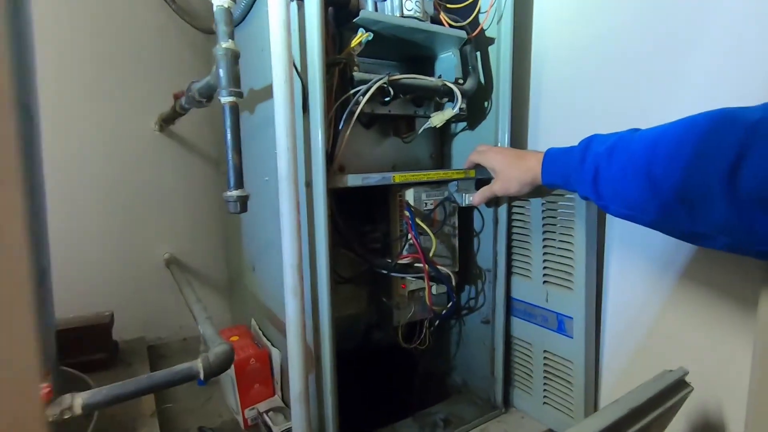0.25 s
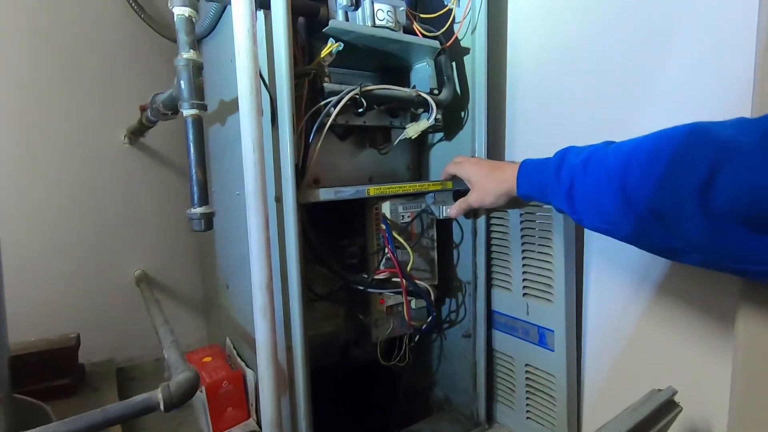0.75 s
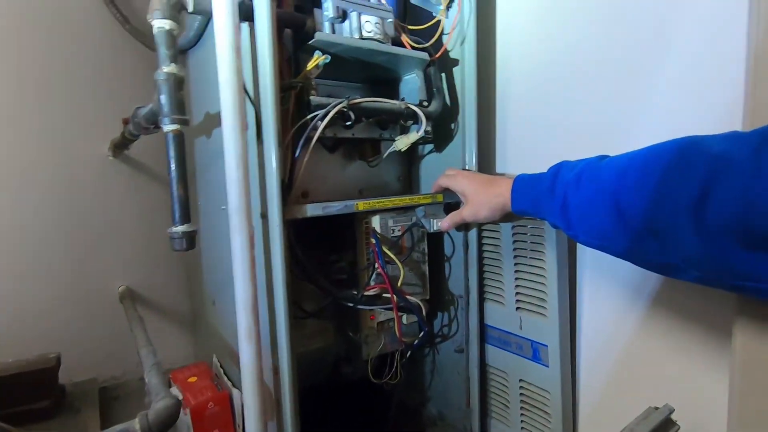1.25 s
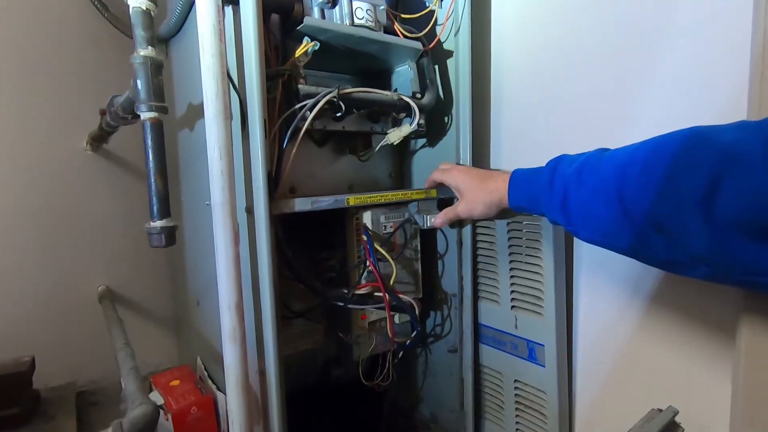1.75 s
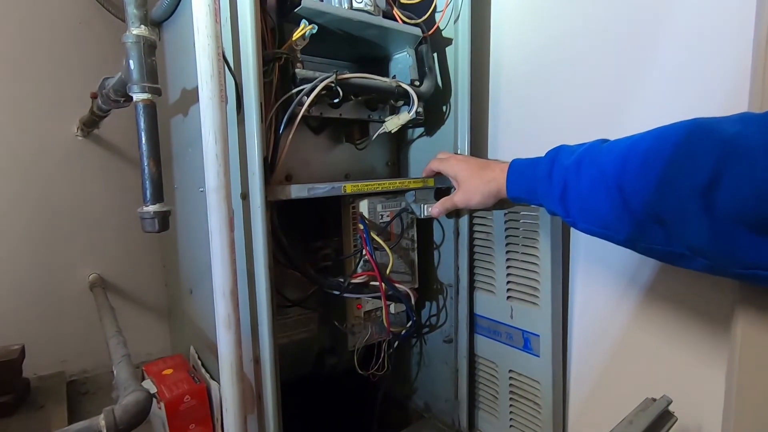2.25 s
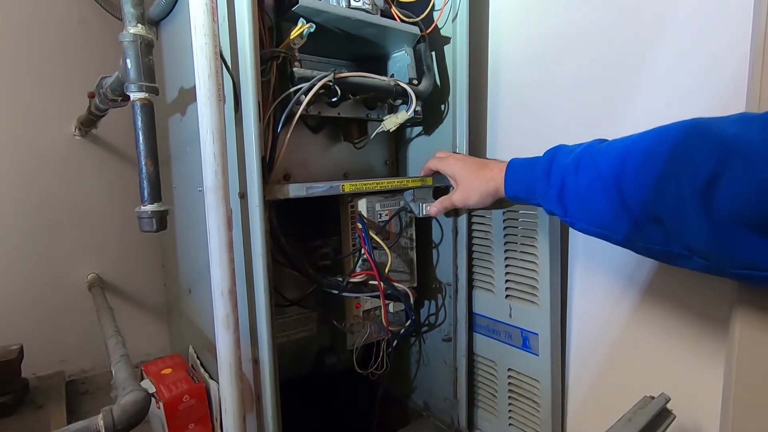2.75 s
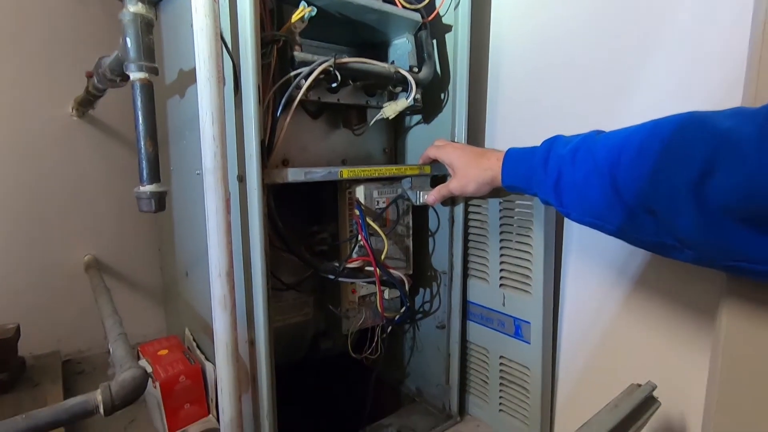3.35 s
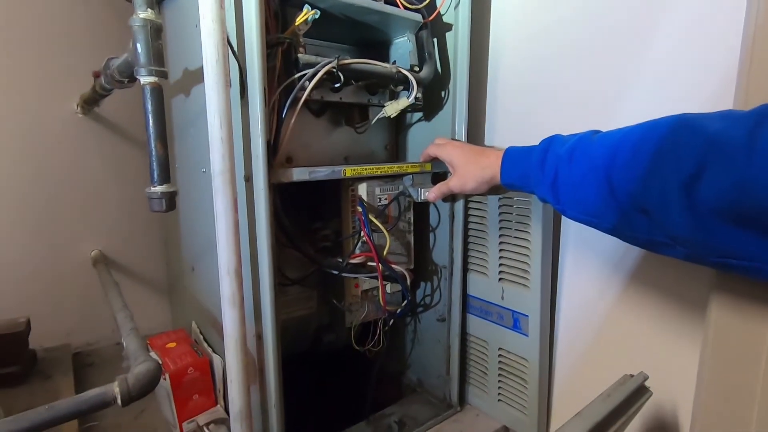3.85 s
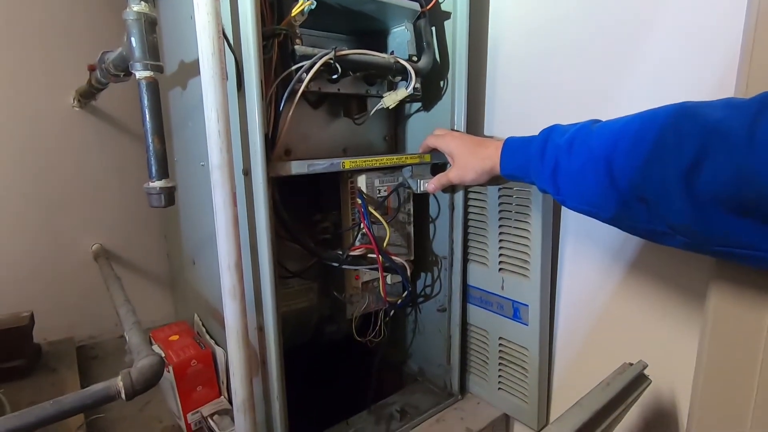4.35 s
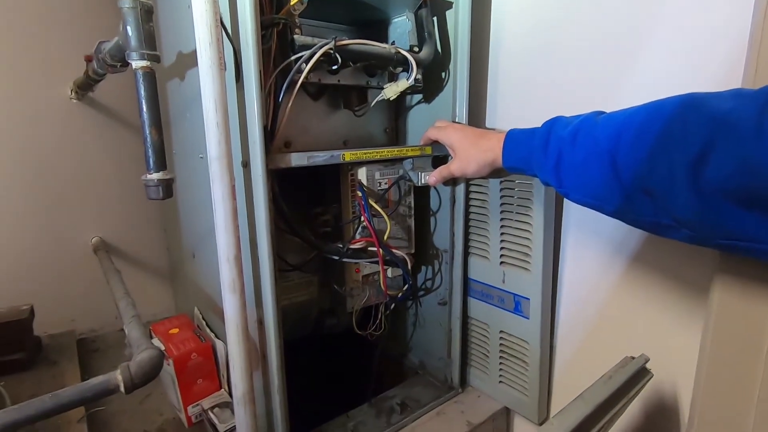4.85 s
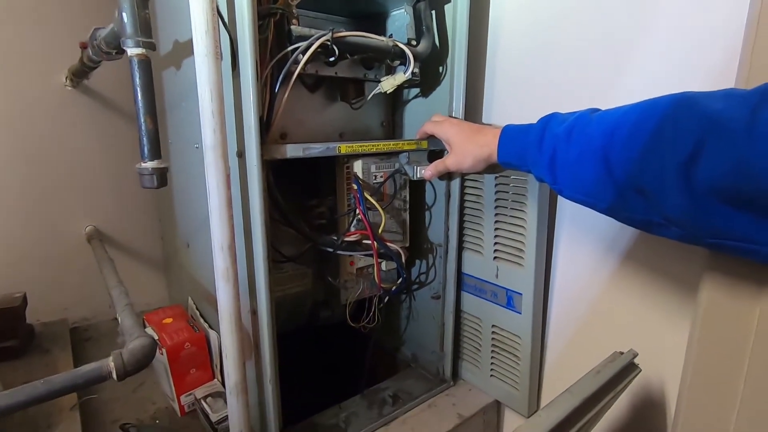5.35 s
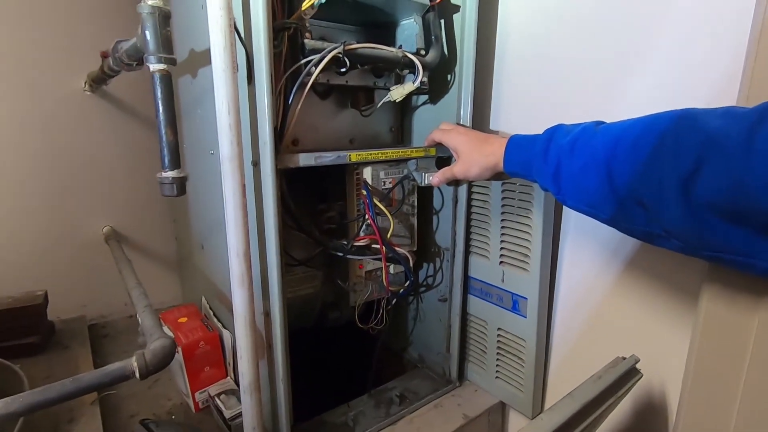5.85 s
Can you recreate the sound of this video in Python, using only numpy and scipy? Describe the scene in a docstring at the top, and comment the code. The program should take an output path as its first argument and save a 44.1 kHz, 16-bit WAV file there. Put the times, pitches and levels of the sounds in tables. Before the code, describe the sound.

A metallic clank dies away, a scuff and hard knock hit the camera, then a furnace blower swells into a low humming, booming rush of air.

```python
"""Furnace draft motor in an open cabinet

Mains hum and shaft tones, made of sine waves, sit in a booming airflow made of coloured noise. The motor
runs in an open sheet-metal cabinet, an arm's length from a small camera with two sound ports. A clank dies
away and something scuffs, both shaped noise; small ticks and a knock on the camera are sums of dying sines.
From the knock on, the stereo picture folds to one duller channel for some seconds, then creeps open again."""
import sys
import numpy as np
from scipy import signal
from scipy.fft import rfft, irfft
from scipy.io import wavfile
from scipy.ndimage import uniform_filter1d, map_coordinates

SR = 44100
rng = np.random.default_rng(int(sys.argv[2]) if len(sys.argv) > 2 else 0)


def nominal_scale(level):
    """Amplitude ratio for a level in decibels (scalar or array-like)."""
    x = np.asarray(level, float) / 20
    return 10 ** x


def waveform_to_disk(signal):
    """Save audio, clipped to [-1, 1], as 16-bit WAV at the path in sys.argv[1]."""
    frames = np.transpose(np.atleast_2d(signal))
    scaled = np.clip(frames, -1, 1) * 32767
    samples = np.round(scaled).astype(np.int16)
    wavfile.write(sys.argv[1], SR, samples)


N = 268613  # length in samples
T = np.arange(N) / SR  # time of each sample in seconds
HZ = np.maximum(np.fft.rfftfreq(N, 1 / SR), 1)  # frequencies of the spectrum

# Motor tones. Each entry: (hum order, shaft order), level in dB against the slow trend of the boom.
MOTOR_TONES = {(0, 1): -4.5, (0, 2): -13, (0, 3): -17, (0, 4): -16.5, (1, 2): -9, (2, 0): -13, (0, 5): -12.5, (2, 1): -19.5, (2, 2): -27, (3, 0): -13, (3, 1): -23, (4, -1): -23.5, (0, 9): -28, (4, 0): -38, (0, 10): -23, (4, 1): -17, (4, 2): -22.5, (6, -1): -27, (6, 0): -28.5, (7, 0): -28, (8, 3): -36}
# Level of the narrow band around the hum, with chance dips where noise and tone interfere.
# Each row: time in seconds, level in dB.
HUM_LEVEL = [(0.0, -44.5), (0.29, -34), (0.39, -52), (0.85, -25.5), (1.56, -28), (1.61, -38.5),
             (1.91, -19.5), (1.95, -26), (2.09, -27.5), (2.14, -30.5), (2.19, -26), (2.31, -19.5),
             (2.54, -33), (2.75, -24), (3.09, -27.5), (3.21, -23.5), (3.9, -29), (3.92, -39), (4.02, -27.5),
             (4.51, -27), (4.61, -41), (4.8, -27.5), (4.87, -40), (5.04, -27.5), (5.09, -35), (5.17, -29.5),
             (5.44, -25.5), (5.56, -42), (5.78, -22.5), (6.09, -32.5)]
# The whine of the wheel's blades. Each row: time in seconds, level in dB.
WHINE_LEVEL = [(0.33, -63), (1.0, -53.5), (1.8, -55), (2.3, -53.5), (2.8, -54), (3.4, -51), (3.6, -54.5),
               (3.91, -49.5), (4.2, -54), (4.53, -50), (4.95, -51), (5.5, -56), (6.09, -57)]
# The draft swells as the wheel loads up, then eases.
# Each row: time in seconds, cabinet boom in dB, flue rumble in dB, rush of air in dB.
DRAFT_LEVELS = [(0.0, -38, -38.5, -41.5), (0.35, -38.5, -33.5, -44), (0.58, -35, -29.5, -44),
                (0.66, -29.5, -33.5, -43.5), (0.8, -28, -27.5, -41), (1.25, -27, -25.5, -38.5),
                (1.6, -27.5, -26.5, -39), (1.9, -25, -25.5, -40), (2.25, -28.5, -22, -39.5),
                (2.5, -27, -24.5, -40), (3.2, -28.5, -26, -41), (3.5, -29.5, -27.5, -42),
                (4.6, -32, -29, -42), (4.9, -31.5, -28, -42), (5.3, -33, -30, -41.5), (5.7, -32, -31, -42),
                (6.09, -35, -32, -41.5)]
# Resonances of the flue. Each row: frequency in Hz, width in Hz, relative level in dB.
FLUE_MODES = [(25, 48, -8), (59.6, 11, 5), (62.4, 11, -11.5), (99.6, 49, 0.5), (122.7, 25, -2.5)]
# Resonances of the cabinet. Each row: frequency in Hz, width in Hz, relative level in dB.
CABINET_MODES = [(141.5, 41, -11.5), (191, 19, -19), (210, 39, -15.5), (222.6, 43, -10.5), (246.7, 22, -12),
                 (272, 18, -18.5), (290.6, 21.6, -10), (319, 24, -17.5), (348.5, 33, -17), (387, 20, -19),
                 (412.5, 9.9, -14), (432, 16, -21.5), (480, 49, -23.5), (551, 54, -22), (628, 22, -30)]
# Chance swells and dips of a narrow noisy boom near 228 Hz. Each row: time in seconds, level in dB.
NARROW_BOOM_LEVEL = [(0.0, -47), (0.52, -35.5), (0.57, -67), (0.64, -24), (0.83, -43.5), (1.39, -25),
                     (1.44, -41), (1.49, -22), (1.71, -35.5), (1.75, -17.5), (1.8, -35), (1.93, -25.5),
                     (2.19, -34), (2.22, -22), (2.32, -49), (2.41, -22.5), (2.76, -39.5), (2.88, -20),
                     (2.92, -39), (2.95, -30.5), (3.24, -23.5), (3.31, -40), (3.34, -26), (3.7, -40),
                     (3.92, -27.5), (3.95, -46.5), (4.0, -27.5), (4.14, -41), (4.17, -36.5), (4.51, -31.5),
                     (4.63, -53), (4.7, -31.5), (5.9, -37.5), (6.09, -40)]
# Colour of the rushing air. Each row: frequency in Hz, relative level in dB per Hz.
RUSH_COLOUR = [(350, -39), (600, 2), (675, -6), (931, -2), (1060, -5), (1290, -8), (1360, -11.5),
               (1530, -10), (1810, -7), (1860, -10), (2200, -13.5), (2920, -13.5), (3700, -16.5),
               (4600, -19), (6200, -24.5), (8060, -55), (13600, -120)]
# The bright part of the rush, fullest while the draft builds. Each row: time in seconds, level in dB.
BRIGHT_LEVEL = [(0.5, -69), (0.8, -50.5), (1.2, -49.5), (2.0, -52), (2.9, -53.5), (3.5, -67), (3.9, -61),
                (4.3, -55.5), (6.09, -53.5)]
# Colour of that bright part. Each row: frequency in Hz, width in Hz, relative level in dB.
BRIGHT_MODES = [(1900, 1000, -8.5), (2750, 1900, 3)]
# The thin hiss of the draft. Each row: time in seconds, level in dB.
THIN_HISS_LEVEL = [(0.25, -62), (0.5, -70), (0.7, -65), (1.1, -59.5), (2.1, -59), (2.4, -60.5), (3.2, -61),
                   (4.5, -59), (5.0, -59.5), (5.3, -57), (6.09, -57)]
# Colour of the thin hiss. Each row: frequency in Hz, relative level in dB per Hz.
THIN_HISS_COLOUR = [(3060, -17), (5200, -3), (5860, -4), (6570, 1.5), (7620, -2), (8830, -8.5), (9960, -9),
                    (10900, -14.5), (11400, -30.5), (13900, -28.5), (14600, -47), (22000, -120)]
# Panel ripples in rush and hiss. Each row: frequency in Hz, width in Hz, strength in dB.
PANEL_RIPPLES = [(775, 97, 2.5), (938, 18, 5), (1119, 15, 6.5), (1270, 36, 3), (1432, 21, 8.5),
                 (1617, 27, 2.5), (1895, 41, 1), (1972, 42, 2.5), (2073, 49, 3), (2350, 51, -1.5),
                 (2580, 33, 1.5), (3130, 120, -1), (4850, 200, -1.5), (6750, 95, 0), (7670, 980, 1.5)]
# Stereo width of the open picture. Each row: frequency in Hz, side minus mid in dB.
SIDE_COLOUR = [(60, -33.5), (110, -39), (190, -75), (340, -10.5), (600, -10), (1060, 2), (1890, -2),
               (3360, -7.5), (5970, -2.5), (10600, 4.5)]
# Modes of the camera body. Each row: frequency in Hz, time to fall 60 dB in seconds,
# left level in dB, right level in dB, lag of the right in radians.
BODY_MODES = [(115, .07, -14, -5.5, 3.), (155, .09, -20, -13, 2.4), (215, .045, -10, -7.5, -1.4),
              (850, .02, -18, -12, 2.3), (1150, .012, -9, -5, 3.0), (1270, .055, -14, -17, 2.5),
              (1620, .025, -19, -18, 1.6), (2800, .01, -26, -20, 1.8), (3250, .01, -24, -18, 1.8)]
# Colour of the scuff. Each row: frequency in Hz, width in Hz, relative level in dB.
SCUFF_MODES = [(1550, 1300, 10.5), (2500, 1300, -5), (3800, 400, -12), (5500, 2500, -33), (7070, 630, -7),
               (9600, 1500, -13)]
# The scuff's squeal. Each row: time in seconds, level in dB.
SQUEAL_LEVEL = [(0.1, -78), (0.15, -66), (0.17, -51), (0.19, -47), (0.25, -51), (0.285, -50), (0.306, -57),
                (0.34, -51.5), (0.43, -56), (0.5, -61), (0.6, -90)]
# Resonances of the squeal. Each row: frequency in Hz, width in Hz, relative level in dB.
SQUEAL_MODES = [(3675, 180, 0), (3900, 200, -9)]
# Colour of the clank. Each row: frequency in Hz, relative level in dB per Hz.
CLANK_COLOUR = [(300, -28), (430, 1), (540, -9), (610, 1.5), (690, 3.5), (790, -25), (1250, -14),
                (1800, -10.5), (2400, -13.5), (6200, -22.5), (10300, -36.5), (14400, -62), (22000, -120)]
# Small ticks in the cabinet. Each row: start in seconds, overall level in dB.
TICK_TIMES = [(1.4103, -32.5), (3.3094, -43)]
# Bounces of each tick. Each row: delay after the tick in seconds, relative level in dB.
TICK_BOUNCES = [(0, 0), (.0055, -4), (.014, -14)]
# Struck sheet metal. Each row: frequency in Hz, time to fall 60 dB in seconds, relative level in dB.
SHEET_MODES = [(825, .02, 5), (1230, .025, 3), (1480, .022, 4), (1800, .025, 0), (2180, .012, 4),
               (2730, .01, 3), (3600, .008, -14)]
# Colour of the folded channel against the open picture. Each row: frequency in Hz, gain in dB.
FOLDED_COLOUR = [(100, -0.6), (350, -2), (800, -0.1), (1500, 0), (2500, 0.5), (3800, -2.5), (5000, -0.5),
                 (6000, -10), (7500, -1), (10000, 2)]
# Low-bass cut, deepest near 43 Hz. Each row: frequency in Hz, gain in dB.
LOW_BASS_CUT = [(20, -7), (43, -17), (50, -3.5), (56, -0.5), (200, -0.5)]
# Colour of the faint treble noise floor. Each row: frequency in Hz, relative level in dB per Hz.
NOISE_FLOOR_COLOUR = [(2500, -22), (4500, 0), (8000, -6), (11000, -11.5), (14300, -15), (15000, -57.5)]

MAINS_HUM_HZ, SHAFT_HZ, SHAFT_WANDER_HZ = 119.98, 51.9, 0.015
HUM_FLUTTER_DB, HUM_WANDER_RAD = 2.6, 0.8
BLADES = 34
NARROW_BOOM_HZ, NARROW_BOOM_WANDER_HZ = 228, 7
GUST_DB, GUST_PER_S = 1.1, 11
SPUTTER_DB, SPUTTER_PER_S = 6, 10.8
KNOCK_S = 0.2817
THUMP_LATE_S = 0.0022  # the shell's low modes answer after the crack
SCUFF_S, SCUFF_DB, SCUFF_LEAD_DB = 0.16, -41, -49  # it bites at SCUFF_S out of a faint rub
SCUFF_ATTACK_S, SCUFF_HOLD_S, SCUFF_FADE_DB_PER_S = 0.0075, 0.06, -63.5
CLANK_DB, CLANK_T60_S = -27.5, 0.19
FOLD_TAU_S, OPEN_S, OPEN_TAU_S = 0.22, 2.93, 1.54
NOISE_FLOOR_DB = -74.5


def curve(rows):
    """Turn each level column of a time table into one value a sample."""
    s, *columns = np.transpose(rows)
    return [np.interp(T, s, c) for c in columns]


def shape(points):
    """Gain per frequency, drawn through (Hz, dB) points."""
    hz, db = np.transpose(points)
    return nominal_scale(np.interp(np.log(HZ), np.log(hz), db))


def rings(modes):
    """Gain per frequency of resonances, each as steep as two in series."""
    power = 0
    for hz, width, db in modes:
        power = power + nominal_scale(db) ** 2 / (1 + (2 * (HZ - hz) / width) ** 2) ** 2
    return np.sqrt(power)


def noise(gain, side_db=0.):
    """Coloured noise: a mid of rms 1 and an unrelated side."""
    spread = [np.ones_like(HZ), shape(SIDE_COLOUR) * nominal_scale(side_db)]
    mid, side = irfft(rfft(rng.standard_normal((2, N))) * gain * spread, N)
    return np.array([mid, side]) / mid.std()


def walk(rate):
    """A wandering value: random levels held for 1 / rate seconds and smoothed twice; spread near 1."""
    k = int(SR / rate)
    held = np.repeat(rng.standard_normal(N // k + 1), k)
    return 1.278 * uniform_filter1d(uniform_filter1d(held, k), k)[:N]


def ring(start_s, hz, t60_s, lag=0.):
    """One dying tone struck at start_s; it takes part of a cycle to swell."""
    age = np.clip(T - start_s, 0, 1)
    swell = 1 - np.exp(-age * hz / .35)
    decay = np.exp(-np.log(1000) * age / t60_s)
    return swell * decay * np.sin(2 * np.pi * hz * age - lag)


def motor():
    """Magnetic hum at twice the mains, beating with the shaft; the wheel's blades whine."""
    hum_db, whine_db, boom_db = curve(HUM_LEVEL)[0], curve(WHINE_LEVEL)[0], curve(DRAFT_LEVELS)[0]
    shaft = 2 * np.pi * np.cumsum(SHAFT_HZ + SHAFT_WANDER_HZ * walk(3)) / SR
    mains = 2 * np.pi * MAINS_HUM_HZ * T
    hum = nominal_scale(hum_db + HUM_FLUTTER_DB * walk(18)) * np.cos(mains + HUM_WANDER_RAD * walk(14))
    whine = nominal_scale(whine_db + 0.53 * walk(4.6)) * np.sin(BLADES * shaft)
    out = hum + whine
    # the tones swell with the slow trend of the boom and stay loosely in step with hum and shaft
    trend = nominal_scale(uniform_filter1d(boom_db, size=SR // 2))
    for (hum_order, shaft_order), db in MOTOR_TONES.items():
        level = trend * nominal_scale(db + 1.45 * walk(6))
        out += level * np.cos(hum_order * mains + shaft_order * shaft + 0.42 * walk(8))
    return np.sqrt(2) * np.array([out, np.zeros(N)])  # root 2 makes the levels rms


def sputter():
    """Uneven puffs in dB: each jumps up and sags until the next."""
    turns = np.cumsum(SPUTTER_PER_S * (1 + 0.264 * walk(7.3))) / SR
    size = rng.uniform(.3, 1, 200)[turns.astype(int) % 200]
    sag = 1 - 2 * (turns % 1)
    return SPUTTER_DB * uniform_filter1d(size * sag, size=SR // 70)


def patchy(x, patchy_db, hz, seconds):
    """Let patches of the spectrum, about hz wide and seconds long, swell and fade by chance."""
    f, t, z = signal.stft(x, SR, nperseg=512)
    field = rng.standard_normal((400, 800))
    places = np.meshgrid(f / max(hz, 60), t / max(seconds, .008), indexing="ij")
    db = map_coordinates(field, places, order=1)
    return signal.istft(z * nominal_scale(patchy_db * db), SR, nperseg=512)[1][..., :N]


def narrow_boom():
    """Chance swells and dips of a narrow noisy boom, played as a sine of wandering pitch."""
    level = nominal_scale(curve(NARROW_BOOM_LEVEL)[0] + 1.1 * walk(25.02))
    phase = 2 * np.pi * np.cumsum(NARROW_BOOM_HZ + NARROW_BOOM_WANDER_HZ * walk(22)) / SR
    return np.sqrt(2) * level * np.sin(phase)


def draft():
    """Turbulence booms in flue and cabinet and rushes past the panels; a thin hiss flutters on top."""
    boom_db, deep_db, rush_db = curve(DRAFT_LEVELS)
    flutter, puffs_db = walk(30), sputter()
    boom = nominal_scale(boom_db + 0.74 * walk(9)) * noise(rings(CABINET_MODES))
    boom += nominal_scale(deep_db + 1.13 * walk(6)) * noise(rings(FLUE_MODES))
    boom[0] += narrow_boom()
    ripple = np.sqrt(1 + rings(PANEL_RIPPLES) ** 2)
    rush = nominal_scale(rush_db + 0.11 * puffs_db + 0.5 * flutter) * noise(shape(RUSH_COLOUR) * ripple)
    rush += nominal_scale(curve(BRIGHT_LEVEL)[0] + 0.3 * puffs_db) * noise(rings(BRIGHT_MODES) * ripple)
    hiss_db = curve(THIN_HISS_LEVEL)[0] + GUST_DB * walk(GUST_PER_S) + puffs_db + 1.0 * flutter
    hiss = nominal_scale(hiss_db) * noise(shape(THIN_HISS_COLOUR) * ripple)
    rush = patchy(rush, patchy_db=1.0, hz=236.0, seconds=.03)
    hiss = patchy(hiss, patchy_db=3.5, hz=87.9, seconds=0.1)
    return boom + rush + hiss


def knock():
    """A blow on the camera's shell: most modes reach the two ports nearly in opposition."""
    out = np.zeros((2, N))
    for hz, t60, left_db, right_db, lag in BODY_MODES:
        # the low thump swings the other way, a little late
        start, sign = (KNOCK_S + THUMP_LATE_S, -1) if hz < 400 else (KNOCK_S, 1)
        left = nominal_scale(left_db) * ring(start, hz, t60)
        right = nominal_scale(right_db) * ring(start, hz, t60, lag)
        out += sign * np.array([left, right])
    return uniform_filter1d(out, size=9)  # softens the attack


def scuff():
    """Rubbing noise through broad resonances, with a narrow squeal; both lean to the right."""
    mid, side = noise(rings(SCUFF_MODES), side_db=-3.0)
    bite = np.clip((T - SCUFF_S) / SCUFF_ATTACK_S, 0, 1)
    fade_db = SCUFF_FADE_DB_PER_S * np.clip(T - SCUFF_S - SCUFF_ATTACK_S - SCUFF_HOLD_S, 0, 2)
    rub_db = SCUFF_LEAD_DB + (SCUFF_DB - SCUFF_LEAD_DB) * bite + fade_db + 1.0 * walk(35)
    rub = nominal_scale(rub_db) * np.array([mid, side - 0.49 * mid])
    squeal_level = nominal_scale(curve(SQUEAL_LEVEL)[0] + 1.4 * walk(40))
    mid, side = squeal_level * noise(rings(SQUEAL_MODES), side_db=-1.0)
    return rub + np.array([mid, side - 0.56 * mid])


def clank():
    """The end of a clank: coloured noise that dies away evenly in dB."""
    decay = np.exp(-np.log(1000) * T / CLANK_T60_S)
    return nominal_scale(CLANK_DB) * decay * noise(shape(CLANK_COLOUR))


def ticks():
    """Small ticks in the cabinet, far left: sheet-metal modes struck once and again at each bounce."""
    out = np.zeros(N)
    for s, db in TICK_TIMES:
        for late, bounce_db in TICK_BOUNCES:
            for hz, t60, mode_db in SHEET_MODES:
                lag = rng.uniform(0, 2 * np.pi)
                out += nominal_scale(db + mode_db + bounce_db) * ring(s + late, hz, t60, lag)
    return np.array([out, 0.96 * out])


def fold_picture(mid, side):
    """The picture folds to one duller channel from the knock on and later creeps open."""
    still_open = np.exp(-np.clip(T - KNOCK_S, 0, None) / FOLD_TAU_S)
    reopened = 1 - np.exp(-np.clip(T - OPEN_S, 0, None) / OPEN_TAU_S)
    width = still_open + reopened
    folded = irfft(rfft(mid) * shape(FOLDED_COLOUR), N)
    return width * mid + (1 - width) * folded, width * side


def scene():
    """Turn the mid and side of the cabinet's sounds into left and right, and add the knock."""
    mid, side = motor() + draft() + scuff() + clank() + ticks()
    mid, side = fold_picture(mid, side)
    return np.array([mid + side, mid - side]) + knock()


def noise_floor():
    """A faint wide treble noise floor, unrelated left and right, flickering in level."""
    floor = irfft(rfft(rng.standard_normal((2, N))) * shape(NOISE_FLOOR_COLOUR), N)
    return nominal_scale(NOISE_FLOOR_DB + 3.9 * walk(13)) * floor / floor.std()


def roll_off(x):
    """The treble ends steeply here."""
    return signal.sosfilt(signal.butter(12, 14600, fs=SR, output="sos"), x)


def record(dry):
    """Cut the low bass, deepest near 43 Hz, and add the faint treble noise floor."""
    thinned = irfft(rfft(dry) * shape(LOW_BASS_CUT), N)
    mix = thinned + noise_floor()
    return roll_off(mix)


dry = scene()
out = record(dry)
waveform_to_disk(out)
```